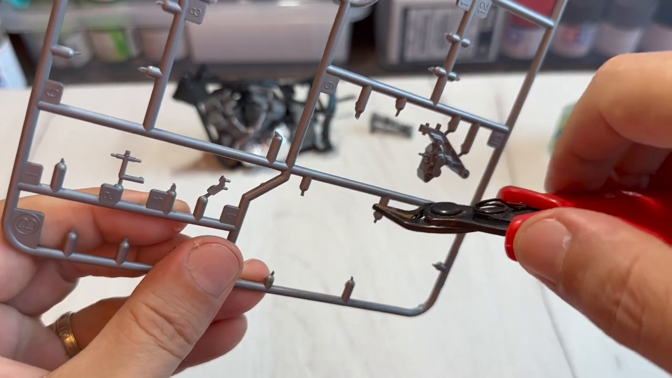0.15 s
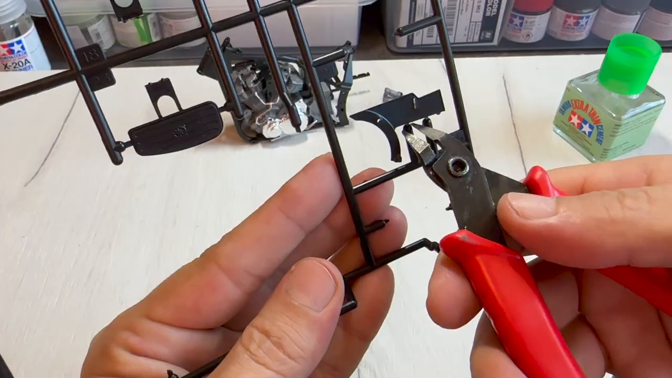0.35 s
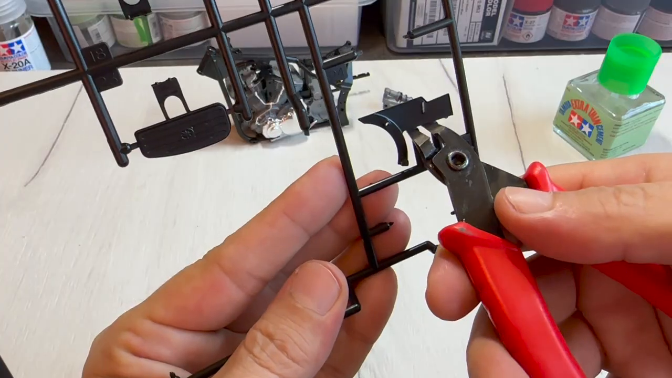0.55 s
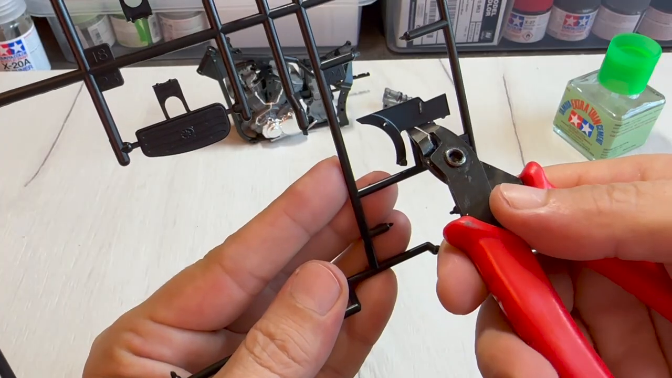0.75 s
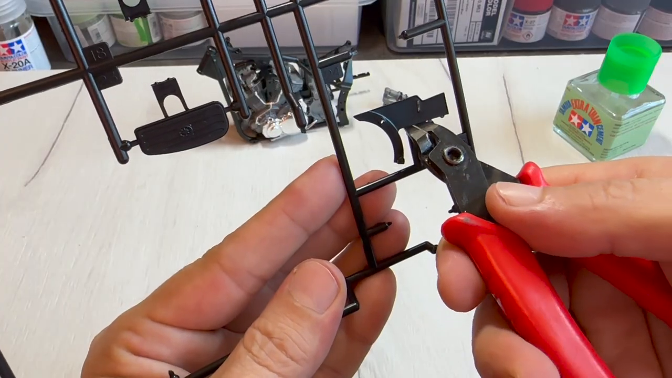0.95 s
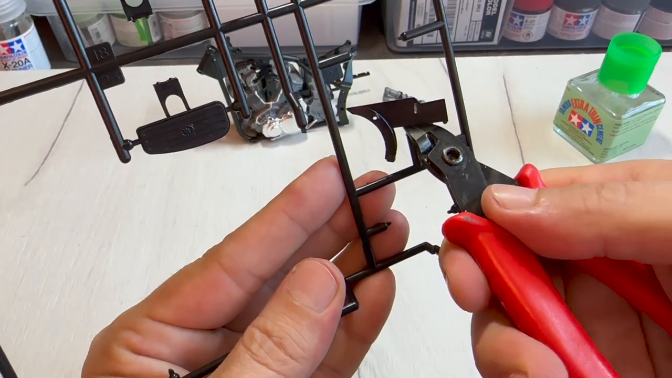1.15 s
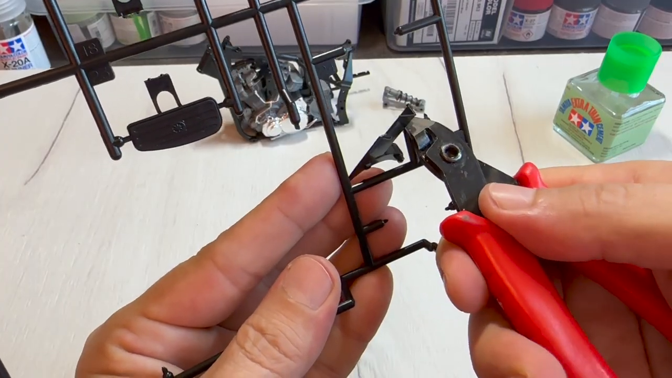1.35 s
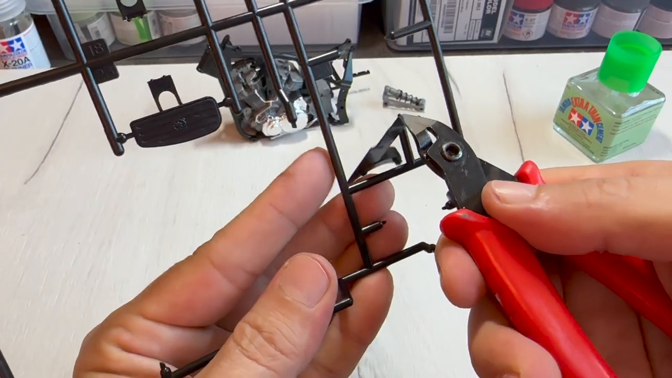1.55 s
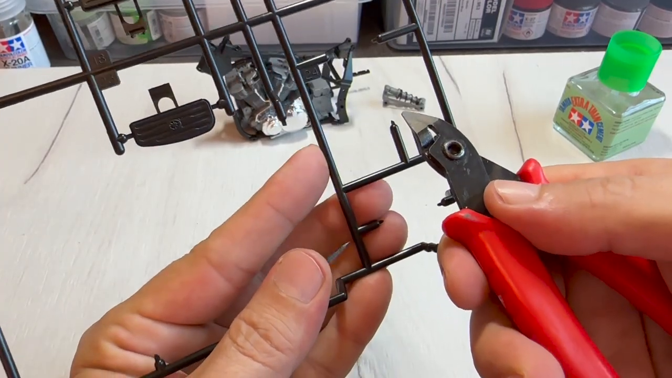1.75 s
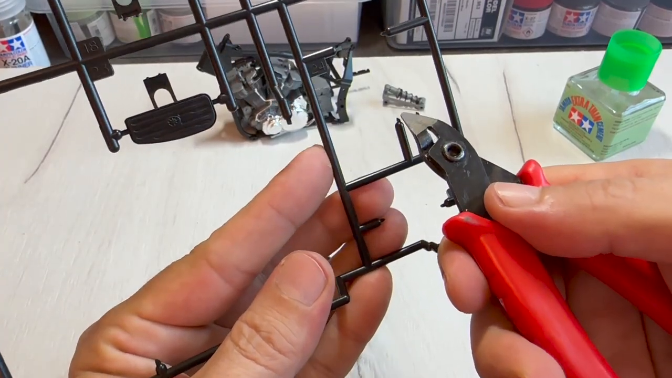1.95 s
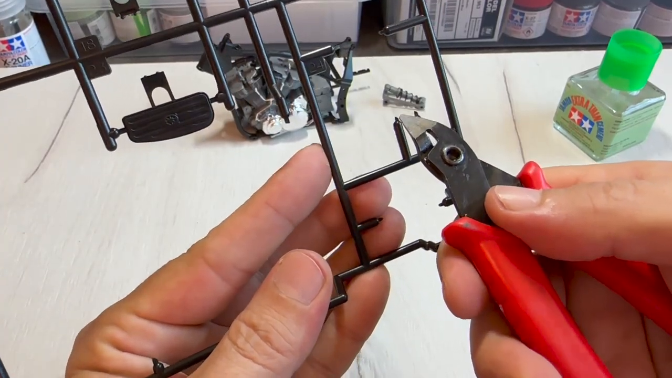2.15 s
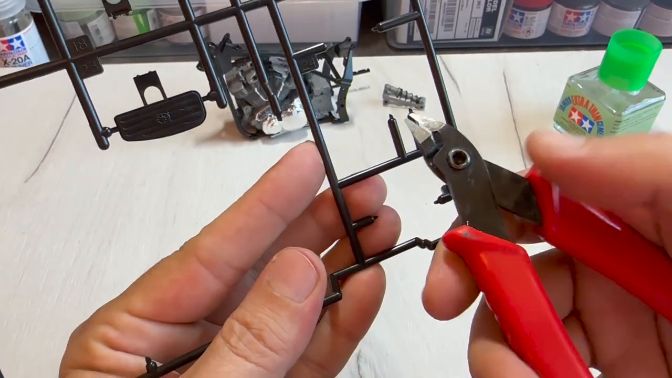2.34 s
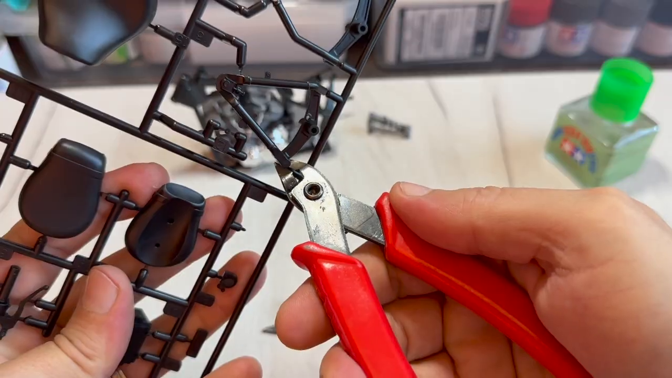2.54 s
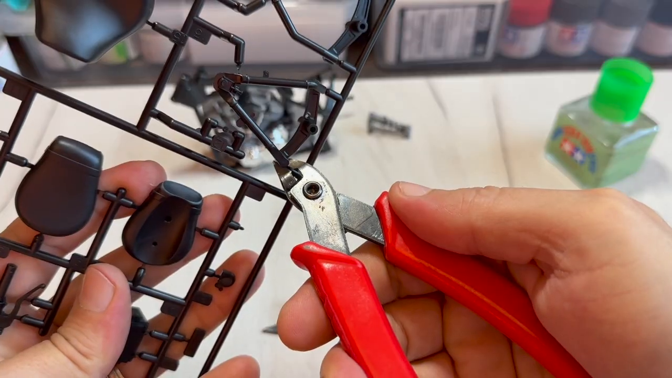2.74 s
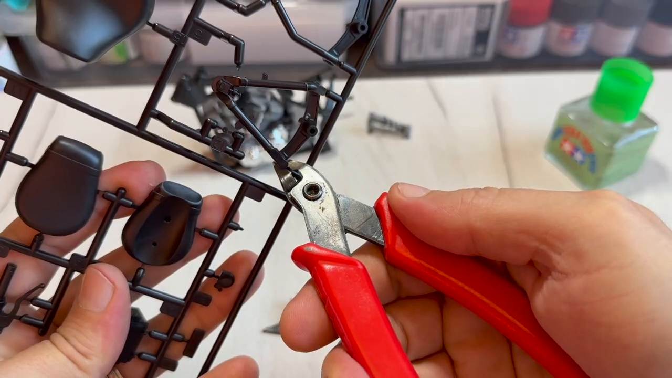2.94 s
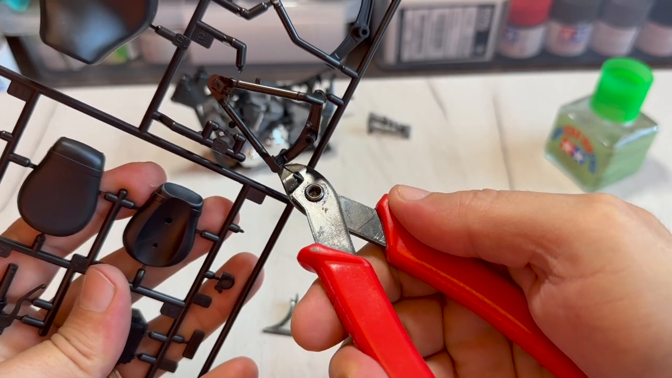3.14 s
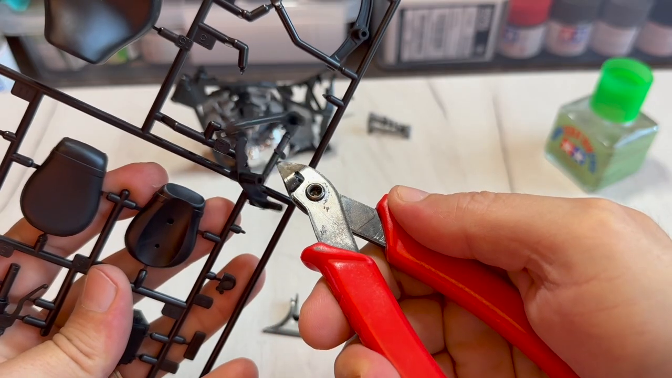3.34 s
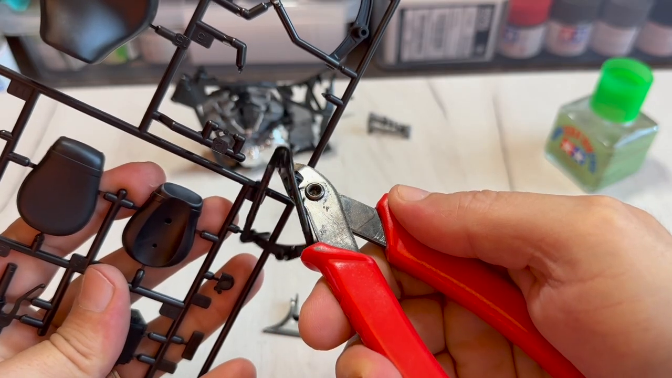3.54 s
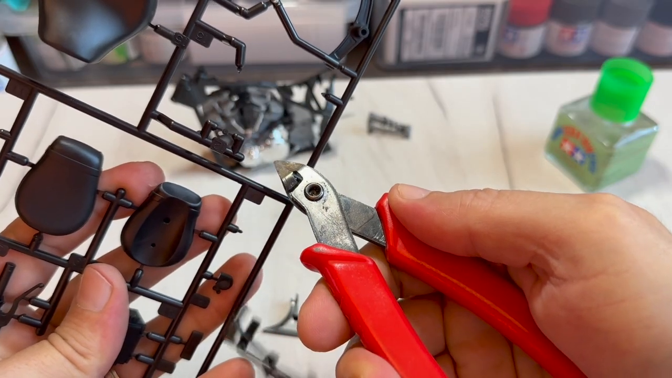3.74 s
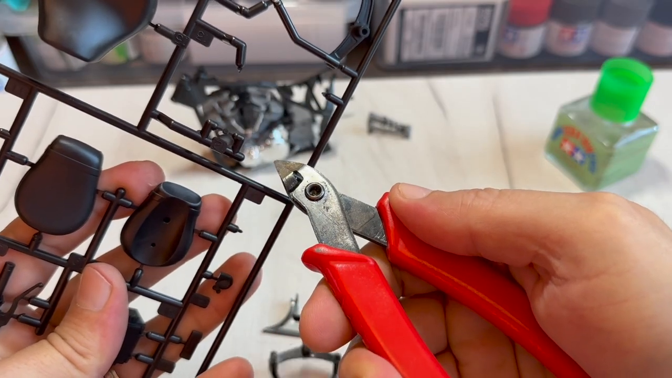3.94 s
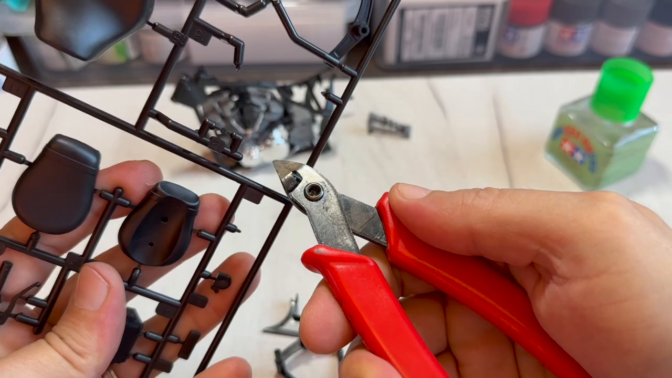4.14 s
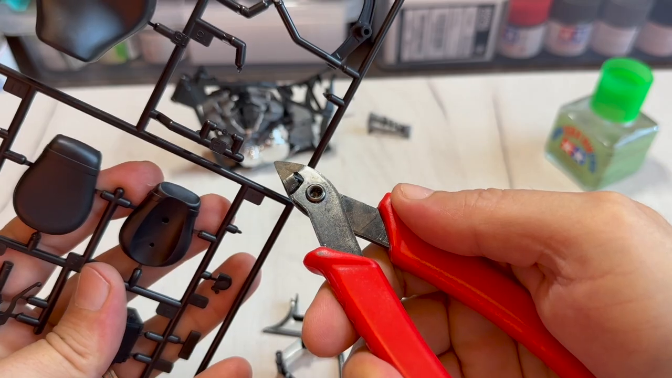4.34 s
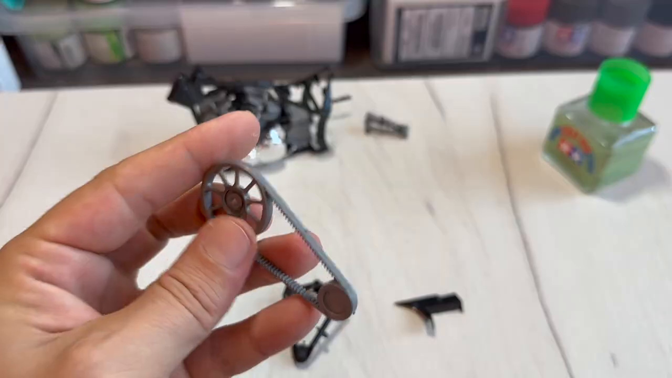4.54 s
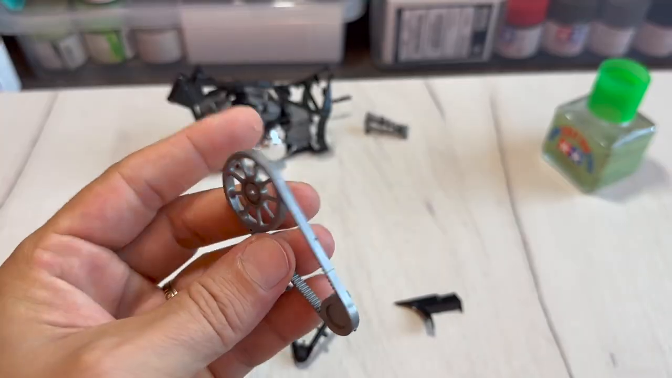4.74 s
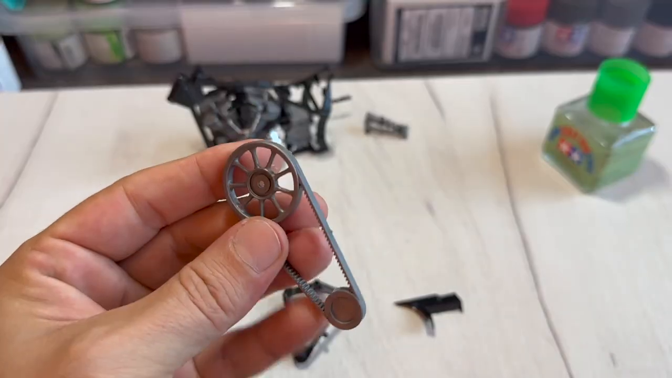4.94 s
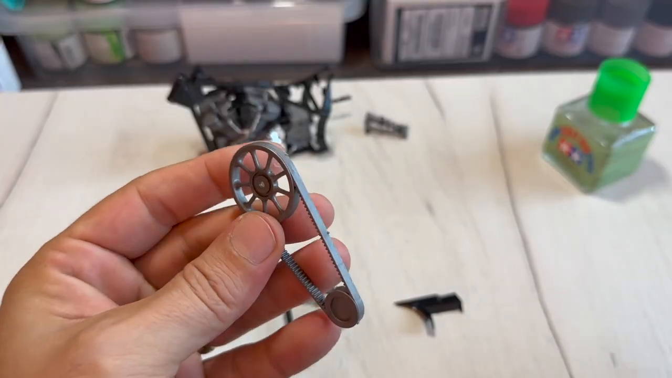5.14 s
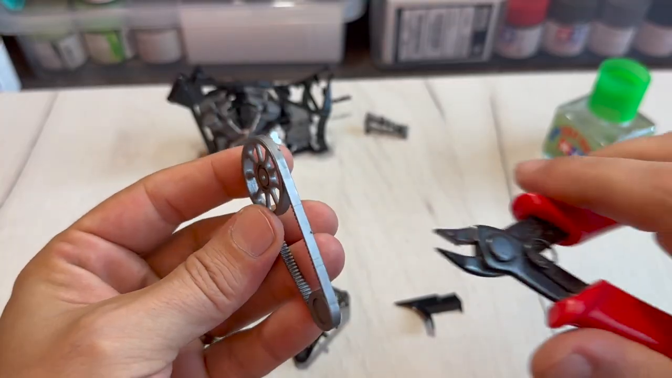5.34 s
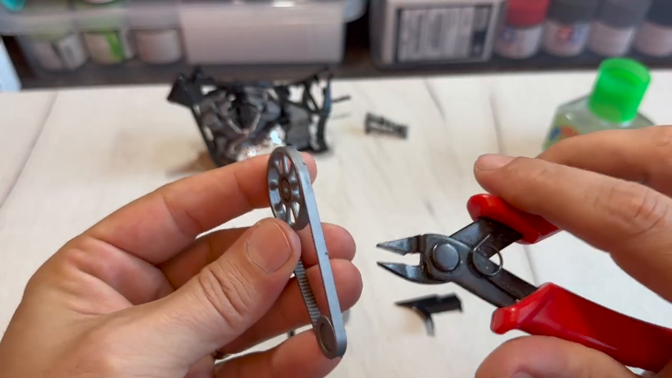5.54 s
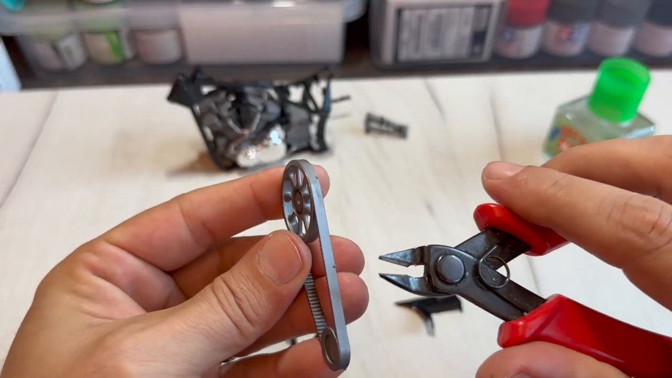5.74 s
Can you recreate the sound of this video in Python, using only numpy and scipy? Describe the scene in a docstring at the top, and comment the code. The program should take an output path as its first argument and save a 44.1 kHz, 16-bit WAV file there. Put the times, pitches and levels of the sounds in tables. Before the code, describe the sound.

At the very start a small plastic part hits a tabletop and bounces in a quick rattle lasting about 0.3 seconds. Near 1.2 seconds side cutters close with a soft snap and a low thud from the plastic frame. The loose piece ticks and scrapes faintly against the jaws, then drops and clatters from 1.7 to 2.1 seconds. A faint low hum swells from about 2.4 seconds. At 3.2 seconds comes a louder, sharper snip with a thud, followed by a string of light ticks. The part lands at 3.8 seconds with the loudest click and bounces until about 4.2. From 4.5 seconds fingers rub very softly over plastic, with a couple of small ticks. Everything is close to a stereo microphone, slightly left, in a small room with a quiet rumble and faint hiss that shift abruptly a few times.

```python
"""A tabletop in a small room: side cutters snip plastic parts from their frame close to a stereo mic. Each snip
snaps the jaws and shakes the frame. Loose parts tick and scrape against the jaws, drop, bounce and rattle, each
ringing in its own modes; after the second snip the ticks ring the frame itself. Fingers rub over plastic. Under
it lie a swelling low hum, a rumble and a faint hiss. Four sections follow each other, joined abruptly."""
import sys
import numpy as np
from scipy import signal
from scipy.fft import rfft, irfft, next_fast_len
from scipy.io import wavfile
from scipy.ndimage import map_coordinates

SR = 44100
rng = np.random.default_rng(int(sys.argv[2]) if len(sys.argv) > 2 else 0)


def materialize(psi):
    """Save the field psi as 16-bit PCM at rate SR to the path in sys.argv[1].

    A 1-D psi becomes a single channel; in a 2-D psi each row is a channel.
    """
    bounded = np.clip(np.atleast_2d(psi).T, -1, 1)
    quanta = np.round(bounded * 32767).astype(np.int16)
    wavfile.write(sys.argv[1], SR, quanta)


N = 259741

# section boundaries: time_s
BREAKS_S = [0.2852, 2.41, 4.553]


def part_contacts():
    """Parts and the frame tick and bounce: each contact cracks, rings the modes of what is struck and excites
    the room."""
    # on jaws, frame or finger: start_s, level_db, treble_re_level_db, hardest_mode_hz
    ticks = [(0.4495, -52, -9.5, 2750), (1.1773, -50, -2, 14250), (1.2271, -49.5, -2, 11200),
             (1.326, -58.5, 6, 3725), (1.607, -60.5, 13.5, 15450), (1.6236, -54.5, 8, 4722),
             (3.1177, -63, -10, 6990), (3.2084, -25, 3.5, 13800), (3.27, -51, 10.5, 10600),
             (3.3076, -39.5, 4, 5710), (3.343, -46.5, 5.5, 6990), (3.3505, -44, 6.5, 6990),
             (3.4444, -40, 5, 9810), (3.4963, -46.5, 4, 5710), (3.5047, -38, 7.5, 13800),
             (3.5417, -42, 3, 12400), (3.5745, -50.5, 0, 10600), (3.6439, -56, 0, 12400),
             (3.6562, -45.5, -15, 1825), (3.699, -60, 11.5, 5710), (4.4762, -50, -6, 888),
             (4.9333, -45.5, -11, 1270)]
    # on the tabletop: start_s, level_db, treble_re_level_db, hardest_mode_hz, knock_re_level_db
    bounces = [(0.0014, -20.5, -19, 566, -6.5), (0.0183, -21.5, -7.5, 8990, -4),
               (0.0575, -37, -11.5, 8990, -3.5), (0.1053, -46, -7.5, 566, 11.5),
               (0.1352, -24, 1.5, 10600, -15), (0.1477, -51, 1.5, 566, 16.5),
               (0.1733, -36.5, 10.5, 8990, 2), (0.194, -36, 5.5, 7560, -2),
               (0.2124, -37, -6.5, 10600, -1.5), (0.2192, -37.5, 7.5, 14500, 6),
               (0.2309, -35.5, 1, 10600, -1.5), (0.2593, -36, -4, 8990, -12),
               (0.2644, -48, 20.5, 10600, 10), (1.728, -27.5, 4, 9450, -2.5), (1.7364, -28, 1.5, 11200, 3),
               (1.8311, -20, -8.5, 692, -12), (1.8951, -35, -14.5, 692, -3), (1.9201, -38.5, -5, 692, -5.5),
               (1.9475, -39.5, -4, 11200, -6), (1.9614, -33.5, -9.5, 1575, -10.5),
               (2.0021, -31.5, 4.5, 14250, -2.5), (2.018, -40.5, -3, 11200, -7),
               (2.0431, -36, 4, 14250, -6.5), (3.8124, -13.5, -5.5, 635, -10),
               (3.8252, -20.5, -7, 12400, -0.5), (3.8826, -23.5, -16, 3470, -3.5),
               (3.958, -29, 3.5, 10600, 2.5), (3.9683, -22.5, 0.5, 12400, -17.5),
               (4.0054, -32.5, -8, 10600, -16), (4.0234, -28.5, -1.5, 12400, -8),
               (4.0573, -34, -7.5, 5470, -8), (4.0741, -41, 3, 10600, 6), (4.0965, -35, -9.5, 3470, -8.5),
               (4.2044, -47.5, -15.5, 773, -0.5), (4.213, -42, -27, 635, -8.5),
               (5.2424, -67.5, -5, 595, 25)]
    # modes of each struck piece (the third is the frame): pitch_hz, level_db, t60_s
    struck_modes = [
        [(344, -11, 0.12), (559.6, -5.5, 0.051), (1908, -3.5, 0.055), (5700, -8, 0.052), (7540, 0.5, 0.03),
         (9010, 6, 0.018), (10444, 6, 0.014), (14500, -2.5, 0.044)],
        [(260, -5, 0.11), (692, 0, 0.1), (1575, -6, 0.06), (2750, -6, 0.03), (3725, -7, 0.1), (4722, -9, 0.09),
         (5190, -5, 0.1), (7450, -9, 0.08), (9450, -6, .03), (10270, -8, .05), (11200, 2, 0.07),
         (13000, -3, 0.045), (14250, 1, 0.07), (15450, -2, .09)],
        [(1837, -15, 0.068), (3420, -9, 0.035), (5640, -0.5, 0.018), (7170, 1.5, 0.031), (9660, -3, 0.03),
         (10400, -4, 0.021), (12000, -4, 0.016), (14400, 3.5, 0.021)],
        [(262, -3, 0.079), (635, 0, 0.06), (773, -9, 0.09), (1570, -5, 0.04), (2700, -8, 0.036),
         (3470, -8, 0.02), (4320, -8, .025), (5470, -7, .025), (9100, -6, .02), (10600, -5, 0.025),
         (12400, 0, 0.03), (14100, -4, .025)],
        [(924, -1.5, 0.25), (1240, -1.5, 0.045), (3320, -6, 0.13)],
        [(605, -11, 0.015), (1250, 0, 0.0089), (11200, 3.5, 0.023)],
    ]
    # next struck piece takes over: time_s
    handovers_s = [.29, 2.41, 3.8, 4.4, 4.55]
    # position of each struck piece: left_minus_right_db
    pans_db = [7, 5.5, 7, 5.5, 4.5, 6]
    tick_knock_db, hardest_boost_db = -11.5, 9  # a part held in the air has little knock
    graze_s, graze_db = 0.0035, -19  # light touch ahead of the hit
    ring_db = [[-10], [-19]]  # direct, into the room
    out, t = np.zeros((2, N)), np.arange(SR // 5) / SR
    graze_ramp = (t[t < graze_s] / graze_s) ** 2
    contacts = [(*tick, tick_knock_db) for tick in ticks] + bounces
    for start_s, level_db, treble_db, hardest_hz, knock_db in contacts:
        part = np.searchsorted(handovers_s, start_s)
        pan_db = pans_db[part] - rng.standard_normal()
        spike, chatter = amp(-60 * t / 0.011), amp(-14.5 - 60 * t / 0.059)
        crack = (spike + chatter) * rng.standard_normal(len(t))
        modes = np.array(struck_modes[part])
        modes[np.argmin(abs(modes[:, 0] - hardest_hz)), 1] += hardest_boost_db
        hit = crack + amp(ring_db) * ring(modes, t, scatter_db=3, blur_hz=28)
        rise_s = 0.0006 * amp(np.clip(-.6 * treble_db, -1.5, 12))  # dull contacts build up slowly
        hit *= 1 - (1 - amp(graze_db)) * np.exp(-(t / rise_s) ** 2)
        graze = amp(graze_db) * graze_ramp * rng.standard_normal(len(t))[:len(graze_ramp)]
        contact = np.hstack([[graze, graze], hit])
        colour = [(80, knock_db - 14), (700, knock_db), (3000, 0),
                  (11000, treble_db), (16000, treble_db - 6)]
        direct, send = filtered(contact, lambda hz: amp(level_db + along(colour, hz)))
        add(out, start_s - graze_s, mic_pair(direct, pan_db))
        add(out, start_s - graze_s, amp([[-4 + pan_db / 4], [-4 - pan_db / 4]]) * room(send))
    return out


def cutters():
    """The jaws snap and jolt the frame; its low modes swell last, so the thud falls in pitch."""
    # jaws close: start_s, thud_db, snap_db
    snips = [(1.178, -35, -44), (3.208, -25.5, -35.5)]
    # bending frame: pitch_hz, level_db, t60_s, swell_s
    frame_modes = [(74.6, -11, 0.36, 0.023), (118.4, -1.5, 0.22, 0.021), (162, -7.5, 0.065, 0.0024),
                   (263.6, -9, 0.086, 0.0043), (383, -14.5, 0.075, 0.0037)]
    # snap: pitch_hz, level_db, t60_s
    jaw_modes = [(1397, -19, 0.11), (2316, 2, 0.028)]
    out, t = np.zeros((2, N)), np.arange(SR // 3) / SR
    for start_s, thud_db, snap_db in snips:
        thud = sum(ring([mode], t, scatter_db=0.5) * (1 - np.exp(-(t / swell_s) ** 2))
                   for *mode, swell_s in frame_modes)
        snap = ring(jaw_modes, t, scatter_db=1, blur_hz=45)
        snip = amp(thud_db) * thud + amp(snap_db) * snap
        add(out, start_s, snip * amp([[1.1], [-1.1]]))
    return out


def fingers():
    """Skin slides over plastic: strokes of soft, grainy friction noise."""
    # start_s, attack_s, hold_s, fade_db_per_s, level_db, treble_re_level_db
    strokes = [(4.438, 0.016, 0.03, 320, -76, 5.5), (4.556, 0.019, 0.16, 170, -65.5, -0.5),
               (4.746, 0.031, 0.12, 142, -83.5, 8.5), (4.918, 0.018, 0.0027, 204, -65, -8),
               (5.033, 0.016, 0.0037, 596, -86, 13.5), (5.178, 0.055, 0.044, 106.5, -92, 14.5),
               (5.763, 0.044, 0.1, 102, -73, -23)]
    # friction spectrum: freq_hz, density_db
    skin = [(120, -23.5), (200, -1.5), (500, -12), (821, -18), (2330, -15.5), (3560, -27), (5040, -18.5),
            (6520, -29), (11900, -23), (16000, -29)]
    rub = amp(0.88 * wobble(60)) * noise(skin, correlation=0.55)
    treble = filtered(rub, lambda hz: hz ** 4 / (hz ** 4 + 4700.0 ** 4))
    return sum(amp(level_db) * envelope(*shape) * (rub + (amp(treble_db) - 1) * treble)
               for *shape, level_db, treble_db in strokes)


def scrape():
    """A loose part drags along the jaws: rough friction noise in narrow resonances."""
    # start_s, attack_s, hold_s, fade_db_per_s
    drag = (1.4, .09, .04, 170)
    # centre_hz, half_width_hz, level_db
    resonances = [(3700, 76, 0), (11000, 130, -3), (13100, 160, -1.5), (15300, 220, -3)]
    friction = filtered(rng.standard_normal(N), lambda hz: sum(
        amp(db) / (1 + ((hz - centre_hz) / width_hz) ** 2) for centre_hz, width_hz, db in resonances))
    return amp(-82.5 + 3.2 * wobble(49)) * envelope(*drag) * unit(friction)


def hum():
    """Low tones swell in the third section, wavering and sagging in pitch."""
    # start_s, attack_s, hold_s, fade_db_per_s, pitch_hz, sag_hz_per_s, rms_db
    tones = [(2.41, 0.15, 0.39, 158, 75, 1.9, -53.5), (3.186, 0.044, 0.03, 43, 82.6, 14, -54),
             (3.487, 0.089, 0.14, 10.5, 79.54, .5, -61)]
    out, t = np.zeros(N), np.arange(N) / SR
    waver_cycles = np.cumsum(1.5 * wobble(4)) / SR
    for start_s, *shape, pitch_hz, sag_hz_per_s, rms_db in tones:
        cycles = pitch_hz * t - sag_hz_per_s * (t - start_s) ** 2 / 2 + waver_cycles
        out += np.sqrt(2) * amp(rms_db) * envelope(start_s, *shape) * np.sin(2 * np.pi * cycles)
    return amp(0.66 * wobble(4.1)) * out


def rumble():
    """Deep noise that comes in lumps, nearly alike in both channels."""
    # freq_hz, density_db
    spectrum = [(16, -44.5), (28, -9.5), (48, 4), (64, 0.5), (74, -2), (130, -15.5), (500, -49),
                (650, -65.5), (1100, -120)]
    # time_s, level_db
    contour = [(0, -59), (.5, -59.5), (.67, -56), (.79, -62.5), (1.1, -55), (2.41, -57), (2.69, -63),
               (3.1, -59.5), (3.8, -58), (4.44, -63), (4.55, -56), (4.62, -66), (4.97, -62.5), (5.2, -71.5),
               (5.5, -65), (5.89, -68.5)]
    level_db = np.interp(np.arange(N) / SR, *np.transpose(contour))
    return amp(level_db) * unit(amp(0.26 * wobble(3.6)) * noise(spectrum, correlation=0.9))


def hiss():
    """Smooth, wide noise; its level steps between sections."""
    # freq_hz, density_db
    spectrum = [(88, -29), (150, -2.5), (240, -7.5), (466, -15), (1020, -24), (2100, -20.5), (2400, -14),
                (2870, -28), (6770, -28), (8560, -34), (11900, -39), (14000, -35.5), (16000, -46.5)]
    # per section: start_db, end_db
    levels_db = [(-73.5, -75), (-76.5, -76.5), (-83.5, -83), (-76, -77.5)]
    edges_s = np.repeat([0, *BREAKS_S, N / SR], 2)[1:-1]
    level_db = np.interp(np.arange(N) / SR, edges_s, np.ravel(levels_db))
    return amp(level_db) * noise(spectrum, correlation=0.16)


def room(x):
    """A fresh diffuse tail; bass and top treble are alike in both channels."""
    # freq_hz, t60_s
    decay = [(200, 1), (700, 0.61), (5000, 0.33), (9000, 0.2), (14000, 0.18)]
    gate_s = 0.13  # the tail drops quickly after this
    hz, t, (mid, side) = signal.stft(rng.standard_normal((2, SR // 3)), SR, nperseg=256)
    hz = hz[:, None]
    width = 1.2 * hz / (hz + 300) / (1 + (hz / 9000) ** 4)
    diffuse = np.array([mid + width * side, mid - width * side]) / np.sqrt(1 + width ** 2)
    fade = amp(-60 * t / along(decay, hz)) * np.exp(-(t / gate_s) ** 4)
    tail = signal.istft(diffuse * fade, SR, nperseg=256)[1]
    return signal.fftconvolve(np.pad(x, (200, 0))[None], tail / np.linalg.norm(tail[0]), axes=1)


def mic_pair(x, pan_db):
    """The two ports hear each tone at another level and phase; the phase varies per contact."""
    # freq_hz, share_of_pan
    shadow = [(200, 0.45), (600, 0.85), (1500, 0.36), (4500, 1), (8000, .15)]
    # freq_hz, left_lead_rad
    lead = [(1300, 0), (2500, 1), (4800, .7), (7000, 2), (9000, 1.7), (11700, .3), (14500, -1.3)]
    # freq_hz, lead_deviation_rad
    scatter = [(300, 0), (3000, 1.2), (10000, .1)]
    side, turn = np.array([[.5], [-.5]]), rng.standard_normal()

    def response(hz):
        lead_rad = along(lead, hz) + turn * along(scatter, hz)
        return amp(side * pan_db * along(shadow, hz)) * np.exp(1j * side * lead_rad)
    return filtered(x, response)


def ring(modes, t, scatter_db, blur_hz=0):
    """Damped modes at scattered strengths; phase drift widens each line by blur_hz."""
    hz, db, t60_s = np.transpose(modes)[:, :, None]
    walk = np.cumsum(rng.standard_normal((len(modes), len(t))), axis=1)
    drift_rad = np.sqrt(2 * np.pi * blur_hz / SR) * walk
    level_db = db + scatter_db * rng.standard_normal(hz.shape) - 60 * t / t60_s
    return np.sum(amp(level_db) * np.sin(2 * np.pi * hz * t + drift_rad), axis=0)


def noise(spectrum, correlation):
    """Shaped stereo noise, rms 1."""
    mid, side = filtered(rng.standard_normal((2, N)), lambda hz: amp(along(spectrum, hz)))
    angle = np.arccos(correlation) / 2
    mid, side = np.cos(angle) * mid, np.sin(angle) * side
    return unit(np.array([mid + side, mid - side]))


def envelope(start_s, attack_s, hold_s, fade_db_per_s):
    """Gain that rises, holds and fades, closing at the next break."""
    t = np.arange(N) / SR
    rise = np.clip((t - start_s) / attack_s, 0, 1) ** 2
    fade = amp(-fade_db_per_s * np.maximum(t - start_s - attack_s - hold_s, 0))
    return rise * fade * np.clip((next_break(start_s) - t) / 0.0092, 0, 1)


def add(out, start_s, sound):
    """Mixes a sound in; it fades fast after the next break."""
    left_s = next_break(start_s) - start_s - np.arange(sound.shape[1]) / SR
    sound = sound * np.clip(1 + left_s / 0.021, 0, 1) ** 3
    start = round(start_s * SR)
    sound, start = sound[:, max(-start, 0):], max(start, 0)
    out[:, start:][:, :sound.shape[1]] += sound[:, :N - start]


def next_break(time_s):
    return min((s for s in BREAKS_S if s > time_s), default=2 * N / SR)


def filtered(x, gain):
    """Applies gain(hz) to the spectrum."""
    size = next_fast_len(x.shape[-1] + 4096)
    return irfft(rfft(x, size) * gain(np.fft.rfftfreq(size, 1 / SR)), size)[..., :x.shape[-1]]


def wobble(rate_hz):
    """Smooth random curve, rate_hz knots a second."""
    knots = rng.standard_normal(int(N * rate_hz / SR) + 4)
    return map_coordinates(knots, [np.arange(N) * rate_hz / SR])


def along(points, hz):
    """Interpolates (freq_hz, value) points on a log axis."""
    freqs_hz, values = np.transpose(points)
    return np.interp(np.log(hz + 1), np.log(freqs_hz + 1), values)


def amp(db):
    return 10 ** (np.asarray(db) / 20)


def unit(x):
    """Scales to rms 1."""
    return x / np.sqrt(np.mean(x ** 2) + 1e-20)


def scene():
    return part_contacts() + cutters() + fingers() + hum() + rumble() + hiss() + scrape()


def record(dry):
    """The mic loses the deepest bass and everything above its band limit."""
    low_hz, top_hz = 30, 17000
    return filtered(dry, lambda hz: hz ** 6 / (hz ** 6 + low_hz ** 6)
                    * np.clip((top_hz - hz) / 1600, 0, 1) ** 3)


dry = scene()
out = record(dry)
materialize(out)
```